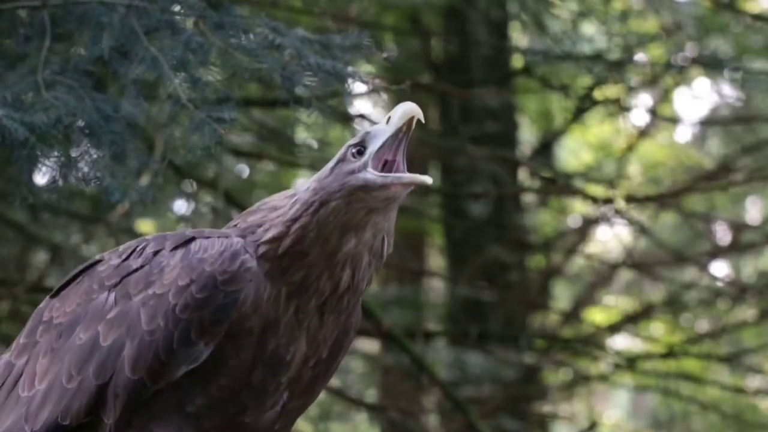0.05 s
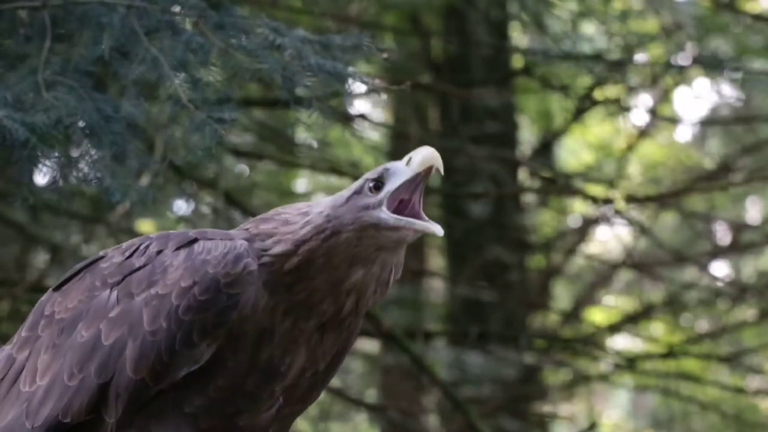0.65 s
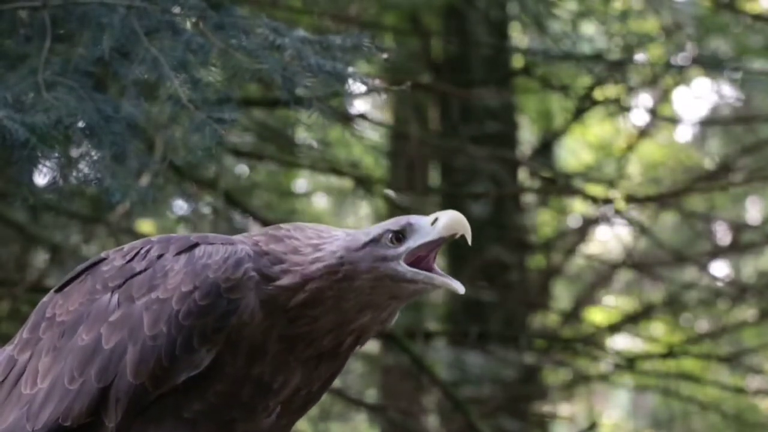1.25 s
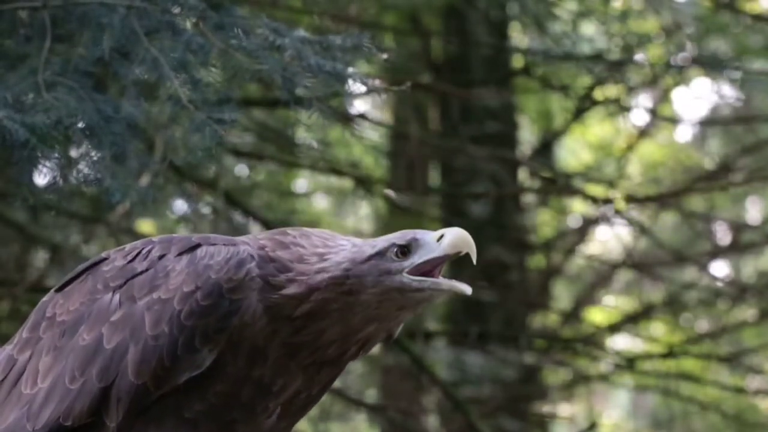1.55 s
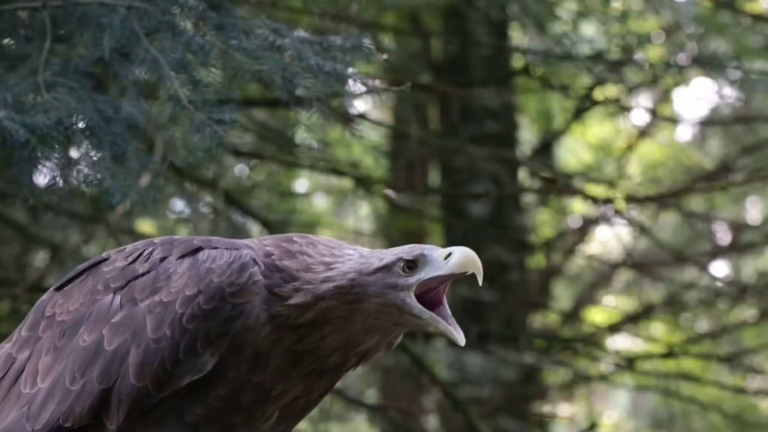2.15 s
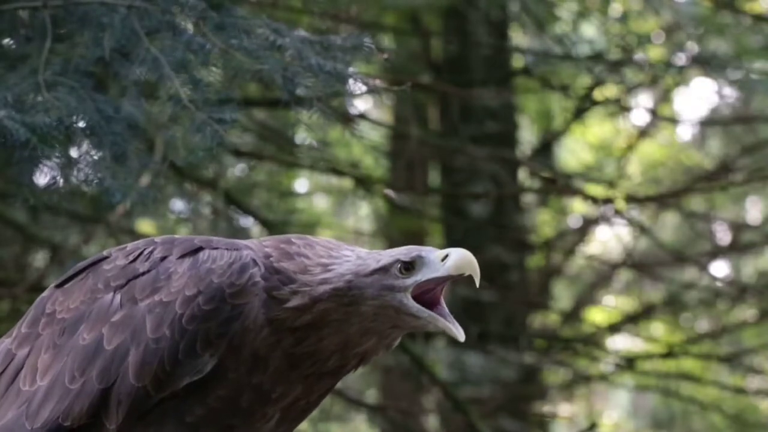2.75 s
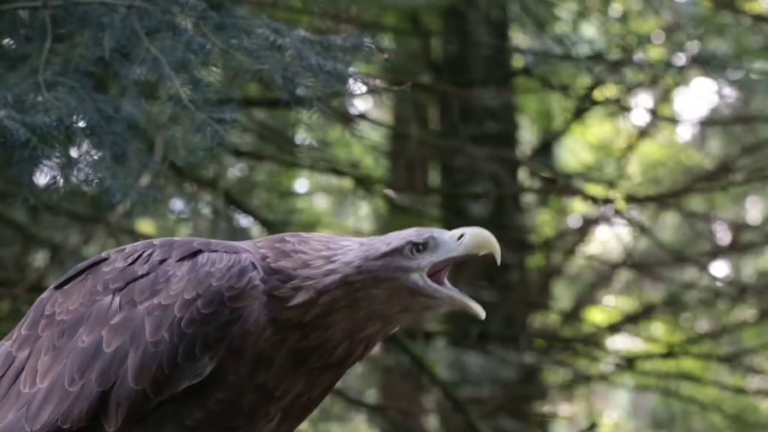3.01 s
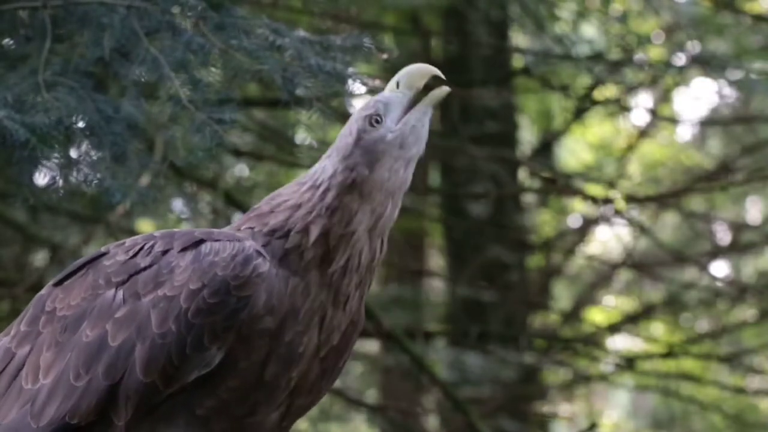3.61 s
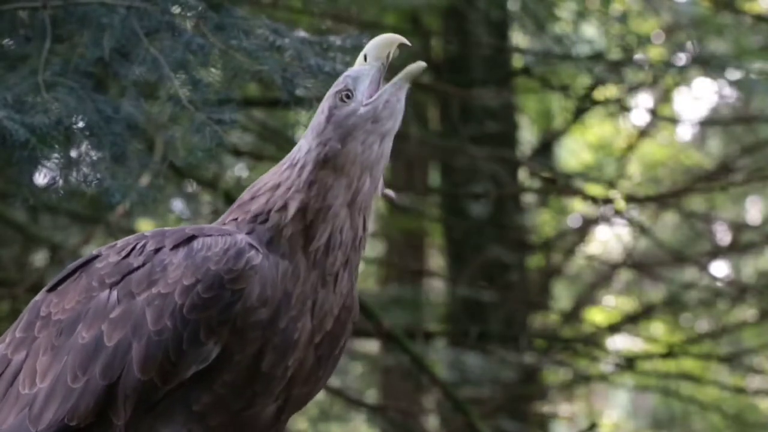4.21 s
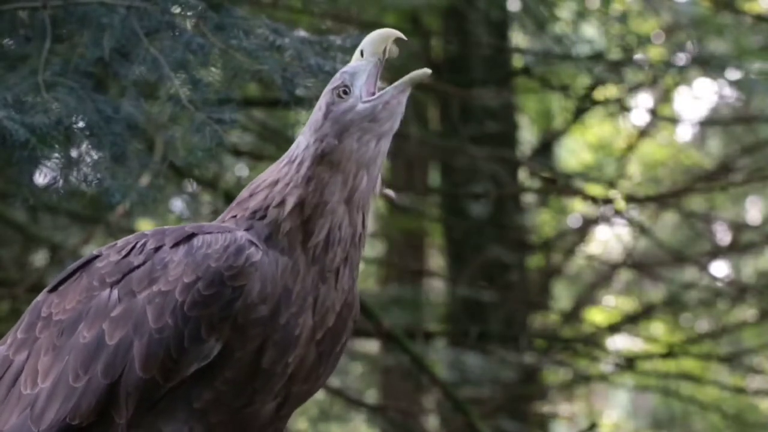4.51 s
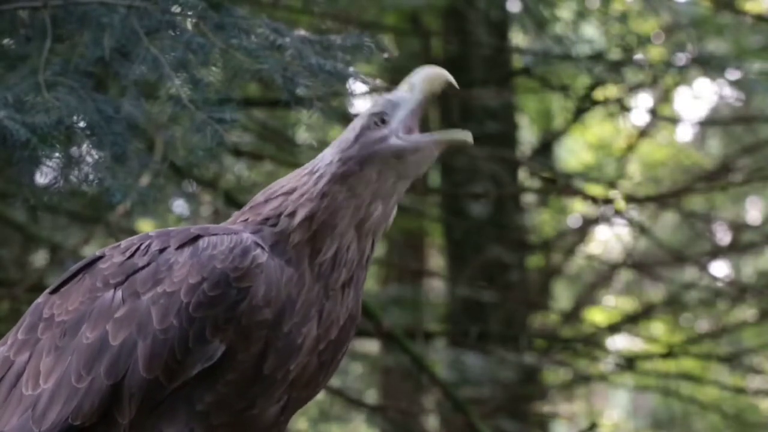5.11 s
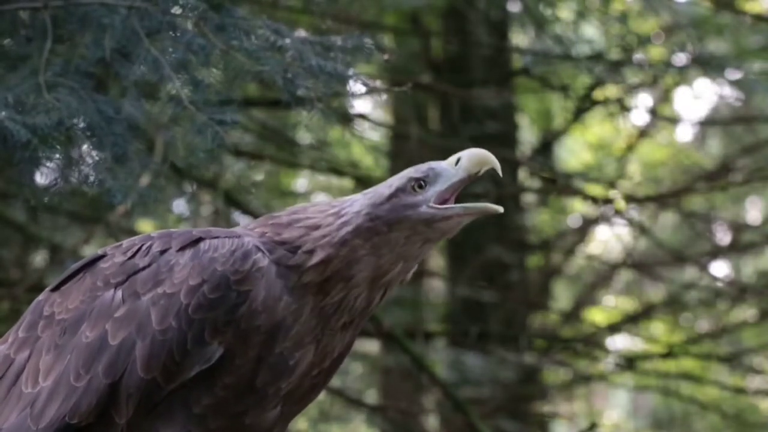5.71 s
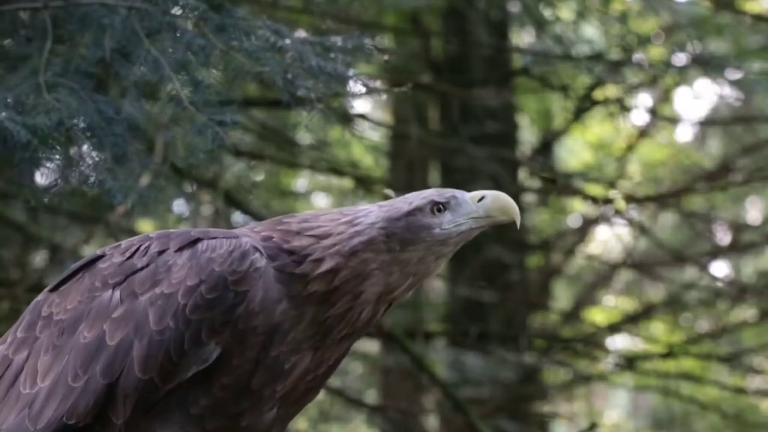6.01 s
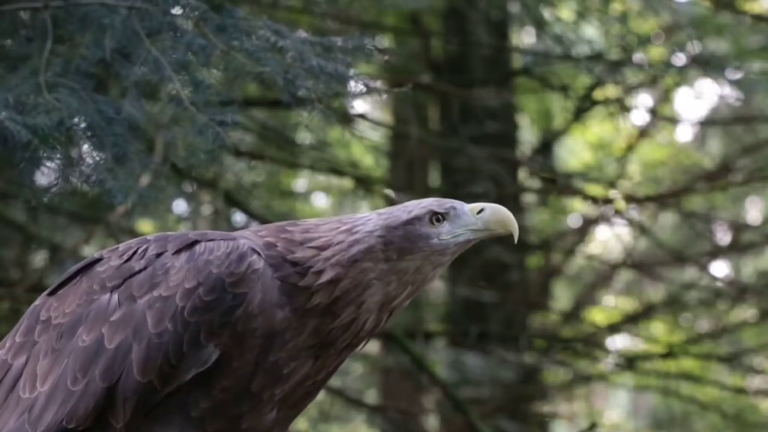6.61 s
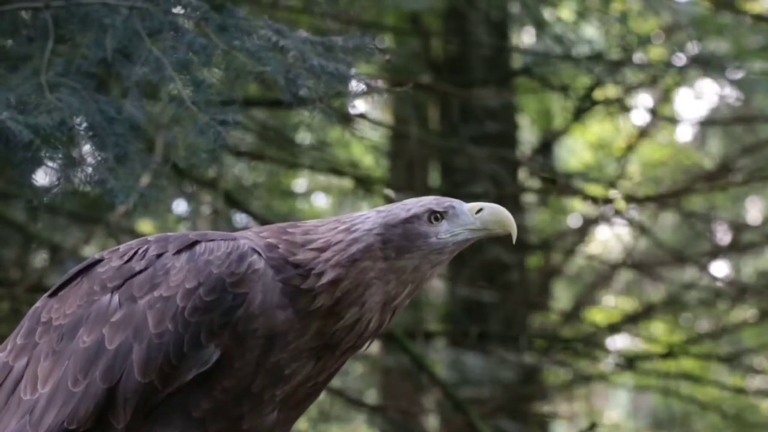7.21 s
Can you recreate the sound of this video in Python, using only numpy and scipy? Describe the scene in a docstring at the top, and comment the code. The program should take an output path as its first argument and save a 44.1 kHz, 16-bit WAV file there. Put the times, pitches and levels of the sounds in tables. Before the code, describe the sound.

Shrill, slightly hoarse yelps come in a quick, even series from a nearby eagle, each rising and cracking into a squeak and a brief rattle. Midway one call is weaker, then the voice grows clearer and rattles longer. The surrounding forest adds a short echo. The calling ends, the bird grunts softly and shuts its beak, and only a very faint, steady woodland hush remains.

```python
"""A conifer wood, close to a perched eagle giving a long run of sharp yelps.
Each yelp climbs in steps to a shrill top, breaks into squeaks and ends in a short rattle of the syrinx.
As the head is thrown back the voice turns purer, flutters more and rattles longer.
The trunks answer; at the end the bird grunts softly and shuts its beak over a faint hush of trees."""
import sys
import numpy as np
from scipy import signal
from scipy.fft import rfft, irfft, next_fast_len
from scipy.io import wavfile
from scipy.ndimage import uniform_filter1d, map_coordinates

SR = 44100
rng = np.random.default_rng(int(sys.argv[2]) if len(sys.argv) > 2 else 0)


def transcribe(signal):
    """Save signal, clipped to [-1, 1], as a 16-bit WAV file at the path in sys.argv[1]."""
    frames = np.atleast_2d(signal).T
    limited = np.clip(frames, -1, 1)
    pcm = np.round(limited * 32767).astype(np.int16)
    wavfile.write(sys.argv[1], SR, pcm)


N = 324118
TIME = np.arange(N) / SR
LOW_REGISTER_HZ, HIGH_REGISTER_HZ = 1383, 1610  # the voice changes register between these pitches

# The run of calls: start_s, climb_s, hold_s, top_hz, hold_end_hz, top_db, rattle_delay_s, rattle_db
YELP_CUES = [(0.093, 0.026, 0.012, 1619, 1700, -14.5, 0.057, -28.5),
             (0.356, .027, 0.011, 1622, 1652, -12.5, 0.057, -29.5),
             (.6111, .027, 0.011, 1589, 1650, -15.5, .066, -32),
             (0.8742, 0.025, .014, 1599, 1645, -14.5, 0.058, -31.5),
             (1.1264, .028, .011, 1615, 1608, -12.5, 0.056, -36),
             (1.3997, 0.046, .023, 1496, 1331, -13, 0.073, -43.5),
             (1.699, 0.039, .026, 1374, 1347, -18, 0.076, -51),
             (1.9588, .037, .005, 1569, 1574, -13.5, 0.065, -35.5),
             (2.1981, 0.037, 0.01, 1580, 1447, -11.5, 0.062, -34),
             (2.4382, 0.034, .01, 1602, 1540, -12, 0.064, -36),
             (2.675, 0.035, .009, 1600, 1487, -10.5, 0.06, -35.5),
             (2.9128, .031, .009, 1602, 1563, -12, .063, -35.5),
             (3.1501, 0.017, 0.0097, 1224, 1333, -28, .112, -27.5),
             (3.4887, 0.031, 0.0087, 1656, 1574, -13.5, 0.085, -29),
             (3.8183, .03, 0.0056, 1670, 1677, -14, .066, -29.5),
             (4.1218, .031, 0.0055, 1624, 1681, -16, 0.064, -29),
             (4.4245, 0.031, 0.011, 1628, 1614, -12.5, 0.062, -30.5),
             (4.7175, 0.031, 0.0099, 1582, 1603, -13, .063, -30),
             (5.0388, 0.032, 0.015, 1546, 1603, -16.5, 0.065, -35),
             (5.283, 0.033, .034, 1567, 1520, -13.5, 0.067, -38.5),
             (5.5358, 0.036, .04, 1542, 1510, -14.5, 0.064, -38.5)]


def yelps(lead_s=0.0004, flutter_hz=118.4, first_surge_s=.007, db_per_hz=0.1087, tiring_db_per_s=93.5):
    """The voice catches with a flutter, climbs to a ledge, jumps to its top, holds and collapses."""
    # Pitch curve of the climb: time_share, start_to_ledge_share
    climb_shape = [(0, 0.023), (.28, .58), (.53, .94), (0.779, 1.15)]
    # A quick climb starts harder: climb_s, attack_s
    attacks = [(.028, .003), (.034, 0.0066)]
    when, rise = np.transpose(climb_shape)
    track = np.zeros(N)
    for start_s, climb_s, hold_s, top_hz, end_hz, top_db, *_ in YELP_CUES:
        throw, hoarse = head_throw(start_s), hoarseness(start_s)
        fall_s = (0.012 + .25 * hold_s) * (1 - 0.4 * throw)
        knots = [*(when * climb_s), climb_s, climb_s + hold_s, climb_s + hold_s + fall_s]
        t = TIME[:int((lead_s + knots[-1]) * SR)] - lead_s
        start_hz = 965.4 + 39.8 * throw
        ledge_hz = 1330 * (top_hz / HIGH_REGISTER_HZ) ** .2
        climb_hz = start_hz + rise * (ledge_hz - start_hz)
        hz = np.interp(t, knots, [*climb_hz, top_hz, end_hz, 0.82 * end_hz])
        # through the hold the level follows the pitch and slowly gives way
        end_db = top_db + db_per_hz * (end_hz - top_hz) - tiring_db_per_s * hold_s
        db = np.interp(t, knots[-4:], [-24 + 0.5 * throw, top_db, end_db, end_db - 20])
        # purer at the top and with the head back
        tilt_db = 3 - 13.5 * throw - np.interp(t, knots[-4:], [0, 1.82, 1.82, 0])
        # each surge of the flutter is higher, louder and brighter
        depth = hoarse * (0.035 + .085 * throw) * np.interp(t, [0, climb_s], [1, 0])
        flutter = depth * np.cos(2 * np.pi * np.maximum(flutter_hz * (t - first_surge_s), -.5))
        tone = syrinx(hz * (1 + flutter), db + 42 * flutter, register(hz), tilt_db + 20 * flutter, hoarse)
        attack_s = np.interp(climb_s, *np.transpose(attacks))
        envelope = np.interp(t, [-lead_s, attack_s, t[-1] - .003, t[-1]], [0, 1, 1, 0])
        add(track, start_s, envelope * tone)
    return track


def squeaks(pure_above_hz=1675, dullest_db=-7):
    """The broken voice catches again in brief glides, purer when high or with the head back."""
    # Squeaks after the yelps: middle_s, length_s, pitch_hz, glide_hz, level_db
    cues = [(0.1547, .016, 1817, 205, -11), (.1718, .008, 1782, -0.5, -18.5),
            (.415, 0.0085, 1691, -120, -5), (.67, .011, 1601, -190, -10.5), (0.685, 0.0066, 1765, 349, -13),
            (.933, 0.0087, 1590, -120, -14), (0.9507, .007, 1916, 124.5, -17),
            (1.185, 0.01, 1582, -330, -15.5), (1.2042, .005, 1765, -200, -12.5),
            (1.442, .0067, 1614, 131.5, -15), (1.488, .018, 1065, -220, -28), (1.78, .026, 1124, -280, -27),
            (2.021, 0.013, 1355, -320, -21.5), (2.0407, 0.0072, 1672, -3, -17),
            (2.259, .017, 1261, -450, -25), (2.277, 0.0033, 1781, 224, -10),
            (2.4993, .016, 1397, -340, -22), (2.5185, .004, 1517, -74, -19),
            (2.7338, .016, 1497, -130, -16), (2.755, .0057, 1790, -1.5, -15),
            (2.9716, .013, 1533, -270, -15), (2.99, 0.0049, 1780, -500, -14),
            (3.241, 0.013, 2100, -300, -30), (3.2542, .014, 1825, -200, -12),
            (3.561, 0.015, 2100, -300, -30.5), (3.572, 0.0072, 1830, -100, -16.5),
            (3.872, 0.0057, 1715, 201, -13), (3.879, .006, 1685, -400, -18.5),
            (4.176, 0.017, 1740, 99, -16.5), (4.483, .02, 1695, -150, -14), (4.773, .0243, 1552, -65, -16),
            (4.793, .0158, 1580, 1.5, -19.5), (5.1008, 0.0083, 1640, -180, -14),
            (5.121, .01, 1625, -4, -20), (5.359, 0.016, 1520, -260, -23.5),
            (5.621, 0.0047, 1787, 241, -16.5)]
    track = np.zeros(N)
    for middle_s, length_s, pitch_hz, glide_hz, db in cues:
        progress = np.linspace(0, 1, int(length_s * SR))
        hz = pitch_hz + glide_hz * (progress - .5)
        tilt_db = -6 * head_throw(middle_s) - 0.5 * max(pitch_hz - pure_above_hz, 0)
        tone = syrinx(hz, db, register(pitch_hz), max(tilt_db, dullest_db), jitter=0.029)
        add(track, middle_s - length_s / 2, np.sin(np.pi * progress) * tone)
    return track


def syrinx(hz, db, high_mix, tilt_db, hoarse=1, jitter=0.0099):
    """An unsteady harmonic tone through the throat, tilted by tilt_db an octave up to harmonic 4."""
    # Timbre of the two registers: harmonic, low_register_db, high_register_db
    harmonics = [(1, 0, 0), (2, 1.5, -3), (3, -0.5, -15), (4, -12.5, -28), (5, -27, -34), (6, -36, -32.5),
                 (7, -36, -59), (8, -51, -68.5), (9, -53.5, -62)]
    # Throat resonances: frequency_hz, gain_db
    throat = [(2700, -1), (2900, -13), (3250, 2), (4300, -2.5), (4950, -6.5), (5400, -1.5), (8000, 4),
              (10000, -13)]
    hz = hz * (1 + hoarse * jitter * wobble(450, len(hz)))
    roughness = hoarse * (.026 - .01 * high_mix)  # uneven cycles, more so in the low register
    hz = hz * (1 + roughness * wobble(1300, len(hz)))
    phase = 2 * np.pi * np.cumsum(hz) / SR
    tone = np.zeros(len(hz))
    for k, low_db, high_db in harmonics:
        source_db = db + low_db + (high_db - low_db) * high_mix + tilt_db * np.log2(min(k, 4))
        shimmer_db = .5 * min(k, 4) * wobble(400, len(hz))
        tone += amp(source_db + along(throat, k * hz) + shimmer_db) * np.sin(k * phase)
    return tone


def register(hz):
    """Crossfade from the low register (0) to the purer high one (1)."""
    return np.interp(hz, [LOW_REGISTER_HZ, HIGH_REGISTER_HZ], [0, 1])


def head_throw(time_s):
    """How far the head is thrown back: 0 level, 1 upright."""
    # Head movement: time_s, throw
    poses = [(.1, 0.21), (.65, 0.12), (1.4, 0.074), (2.95, 0.031), (3.2, 0.62), (3.5, 0.77), (4.2, 0.82),
             (4.75, 0.7), (5.05, 0.41), (5.3, 0.17), (5.55, .22)]
    return np.interp(time_s, *np.transpose(poses))


def hoarseness(time_s):
    """Grit of the yelp under way; long-held yelps settle into a cleaner tone."""
    # Grit by length of hold: hold_s, hoarseness_factor
    grit = [(.014, 1.23), (.026, .55), (.034, .75)]
    starts, _, holds, *_ = np.transpose(YELP_CUES)
    current = np.maximum(np.searchsorted(starts, time_s, side="right") - 1, 0)
    return np.interp(holds[current], *np.transpose(grit))


def rattles():
    """Slack membranes flap after each yelp, longer with the head back."""
    # Gullet resonances: frequency_hz, level_db
    gullet = [(71, -67), (120, -44), (390, -18.5), (530, -18.5), (863, -2), (1270, -1), (1460, -3.5),
              (1720, 2), (2200, -15.5), (2440, -14), (2870, -23.5), (3510, -13.5), (4670, -28.5),
              (9910, -41.5), (15500, -61.5)]
    cues = [(start_s + delay_s, .02 + 0.044 * head_throw(start_s + delay_s), db)
            for start_s, *_, delay_s, db in YELP_CUES]
    return flaps(cues, gullet, rate_hz=205, scatter=.2, spread_db=3, air_db=-8)


def flaps(cues, cavity, rate_hz, scatter, spread_db, air_db, fade_db=5, cutoff_hz=4200):
    """Uneven soft pulses, each with a puff of air, ring a cavity and weaken as the pressure runs out."""
    pulses = np.zeros(N)
    for start_s, length_s, db in cues:
        gaps, sizes = rng.standard_normal((2, 24))
        times = np.cumsum(np.exp(scatter * gaps)) / rate_hz
        times -= times[0]
        inside = times < length_s
        level_db = db + spread_db * sizes[inside] - fade_db * (times[inside] / length_s) ** 4
        pulses[((start_s + times[inside]) * SR).astype(int)] = amp(level_db) * np.sqrt(SR / rate_hz)
    puff = np.exp(-TIME[:SR // 50] / 0.014)
    air = signal.fftconvolve(pulses, puff / np.linalg.norm(puff))[:N] * rng.standard_normal(N)
    soft_pulses = signal.sosfilt(signal.butter(4, cutoff_hz, fs=SR, output="sos"), pulses)
    return signal.fftconvolve(soft_pulses + amp(air_db) * air, ringing(cavity))[:N]


def breath(voice, rattle):
    """Air rushes through the open beak: a centred rasp on the voice, a wide hiss on voice and rattle."""
    # Midrange rasp of the air: frequency_hz, density_db
    rasp_colour = [(30, -32.5), (150, -39), (450, -34.5), (900, -14), (1700, 8), (2500, 5), (3500, -0.5),
                   (5000, -11), (7000, -20.5), (10000, -36), (15000, -59.5)]
    # High hiss of the beak: frequency_hz, density_db
    hiss_colour = [(2000, -34), (5000, -7.5), (7200, 6.5), (9000, -5.5), (11000, -6), (13000, -15),
                   (14800, -11.5)]
    hiss_db = -40 + 5 * head_throw(TIME)  # more from the upturned beak
    hiss = amp(hiss_db) * np.array([noise(hiss_colour), noise(hiss_colour)])
    rasp = amp(-21) * hoarseness(TIME) * noise(rasp_colour)
    return follow(voice) * (rasp + hiss) + follow(rattle) * hiss


def grunts():
    """Soft pulses muffled by the closed beak."""
    # Closing grunts: start_s, length_s, level_db
    cues = [(5.919, 0.027, -44), (5.946, 0.014, -46)]
    # Resonances with the beak shut: frequency_hz, level_db
    closed_beak = [(150, -53), (250, -60), (413, -16), (645, -24), (711, -5), (773, -7.5), (1010, -4),
                   (1160, -32), (1280, -3.5), (1760, -3.5), (2570, -24), (3390, -21), (7000, -89),
                   (9100, -117), (15400, -120)]
    return flaps(cues, closed_beak, rate_hz=190, scatter=.15, spread_db=1.5, air_db=-2)


def fidgets():
    """The beak closes and feathers shift: tiny swells of coloured noise."""
    # Small movements: middle_s, length_s, level_db, tilt_db_per_octave
    cues = [(6.317, 0.0067, -56, -0.5), (6.394, 0.028, -57.5, 2), (6.413, 0.04, -60.5, 0.5),
            (6.982, 0.014, -58, -1), (6.996, 0.021, -48.5, -2)]
    # Beak resonances: frequency_hz, level_db
    beak = [(120, -51), (200, -33), (496, -4.5), (698, -11), (1210, -4.5), (2090, -13.5), (3380, -14.5),
            (12000, -67), (15600, -94), (22000, -120)]
    track = np.zeros(N)
    for middle_s, length_s, db, tilt_db in cues:
        body = ringing([(hz, level_db + tilt_db * np.log2(hz)) for hz, level_db in beak])
        size = int(length_s * SR)
        burst = rng.standard_normal(size) * np.hanning(size)
        add(track, middle_s - length_s / 2, amp(db) * np.convolve(burst, body))
    return track


def wood_echo(source, early_db=-19, early_t60_s=0.18, late_db=-19.5, width=.3):
    """Near branches and the ground answer at once; the farther trunks ring on."""
    # Decay among the trunks: frequency_hz, t60_s
    decay = [(200, 0.3), (1500, 0.63), (3500, 0.54), (7000, .7), (14000, 0.17)]
    # Colour of the tail: frequency_hz, level_db
    colour = [(200, 0.5), (1500, 4.5), (3500, 5.5), (5500, 1.5), (8000, 4.5), (14000, -12.5)]
    hz, t, bands = signal.stft(rng.standard_normal((2, SR)), SR, nperseg=256)
    decay_db = along(colour, hz)[:, None] - 60 * t / along(decay, hz)[:, None]
    late = signal.istft(bands * amp(decay_db), SR, nperseg=256)[1][:, :SR]
    early = rng.standard_normal((2, SR)) * amp(-60 * TIME[:SR] / early_t60_s)
    response = amp(late_db) * late / np.linalg.norm(late[0])
    response += amp(early_db) * early / np.linalg.norm(early[0])
    predelayed = np.pad(source, (SR // 200, 0))
    mid, side = signal.fftconvolve(predelayed[None], response, axes=1)[:, :N]
    return np.array([mid + width * side, mid - width * side])


def opening_echo(voice, skip_s=.262, level_db=-1):
    """The wood is already ringing as the scene opens: the tail of one yelp, without the yelp itself."""
    first_yelp = voice * (TIME < .3)
    tail = wood_echo(first_yelp)[:, int(skip_s * SR):]
    return amp(level_db) * np.pad(tail, ((0, 0), (0, N - tail.shape[1])))


def trees(level_db=-63.5):
    """The faint, steady hush of the wood, centred in the bass and wide above."""
    # Colour of the hush: frequency_hz, density_db
    hush = [(15, -79.5), (25, -51), (55, -32), (160, -35.5), (215, -20.5), (349, -15), (421, -11.5),
            (457, -8.5), (582, -8), (631, 0.5), (741, -3), (5280, -32.5), (8350, -36), (10100, -32),
            (15500, -42.5)]
    # Likeness of left and right: frequency_hz, correlation
    likeness = [(60, 0.86), (240, 0.19), (950, 0.22), (3770, 0.39), (15000, 0.32)]

    def mid_side_gains(hz):
        angle = np.arccos(along(likeness, hz)) / 2
        return np.array([np.cos(angle), np.sin(angle)])

    mid, side = filtered(np.array([noise(hush), noise(hush)]), mid_side_gains)
    return amp(level_db) * unit(np.array([mid + side, mid - side]))


def amp(db):
    """Decibels to gain."""
    return 10 ** (np.asarray(db) / 20)


def unit(x):
    """Scale to rms 1."""
    return x / np.sqrt(np.mean(x ** 2) + 1e-20)


def follow(x):
    """Envelope follower: a short running rms."""
    return np.sqrt(np.abs(uniform_filter1d(x ** 2, size=500)))


def along(points, hz):
    """Read a curve of (frequency_hz, value) points on a log frequency axis."""
    knots_hz, values = np.transpose(points)
    return np.interp(np.log(hz + 1), np.log(knots_hz + 1), values)


def wobble(rate_hz, size):
    """A smooth random curve with rate_hz knots a second."""
    knots = rng.standard_normal(size // 8 + 4)
    return map_coordinates(knots, [np.arange(size) * rate_hz / SR], mode="mirror")


def filtered(x, gain_at):
    """Equalise x with a gain that is a function of frequency."""
    size = next_fast_len(N + SR // 2)
    return irfft(rfft(x, size) * gain_at(np.fft.rfftfreq(size, 1 / SR)), size)[..., :N]


def noise(spectrum):
    """Coloured noise of rms 1."""
    return unit(filtered(rng.standard_normal(N), lambda hz: amp(along(spectrum, hz))))


def ringing(spectrum, size=2048):
    """The minimum-phase impulse response, of energy 1, of a cavity with this spectrum."""
    gain = amp(along(spectrum, np.fft.rfftfreq(size, 1 / SR)))
    cepstrum = irfft(np.log(gain + 1e-6))
    cepstrum[1:size // 2] *= 2
    cepstrum[size // 2 + 1:] = 0
    response = irfft(np.exp(rfft(cepstrum)))
    return response / np.linalg.norm(response)


def add(track, start_s, sound):
    """Mix a sound in at start_s."""
    part = track[max(round(start_s * SR), 0):][:len(sound)]
    part += sound[:len(part)]


def scene():
    """The bird ahead, its echoes and the trees around."""
    # Each band of bird and echo leans a little to one side: frequency_hz, left_minus_right_db
    balance = [(500, 0.5), (1500, 2.5), (2400, 1.5), (3300, 2.5), (4300, -5.5), (6000, -3), (9000, 0.5)]
    voice = yelps() + squeaks()
    rattle = rattles()
    bird = voice + rattle + grunts() + breath(voice, rattle) + fidgets()
    with_echo = bird + wood_echo(bird.mean(axis=0)) + opening_echo(voice)
    panned = filtered(with_echo, lambda hz: amp(np.outer([.5, -.5], along(balance, hz))))
    return panned + trees()


def record(dry, cutoff_hz=15750):
    """A brick-wall low-pass on the mix."""
    return filtered(dry, lambda hz: hz < cutoff_hz)


dry = scene()
out = record(dry)
transcribe(out)
```